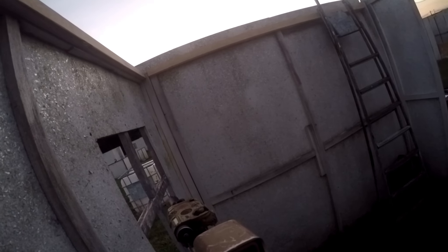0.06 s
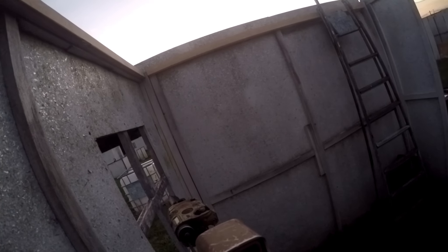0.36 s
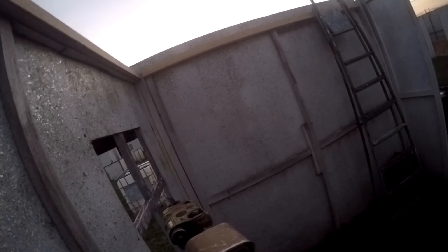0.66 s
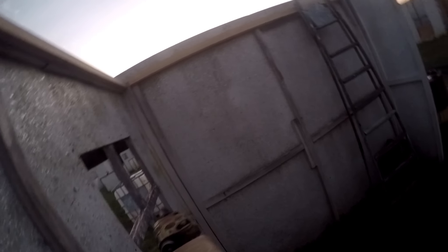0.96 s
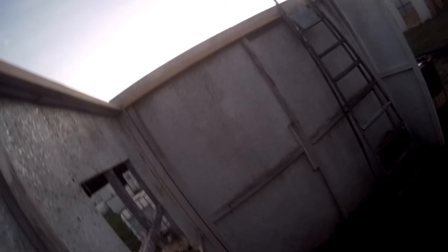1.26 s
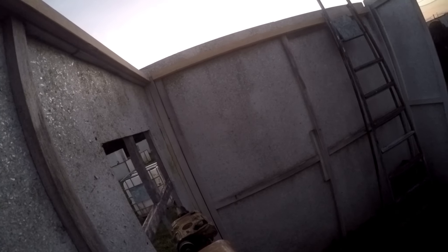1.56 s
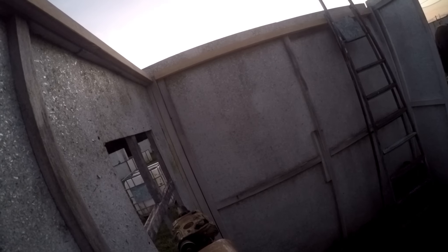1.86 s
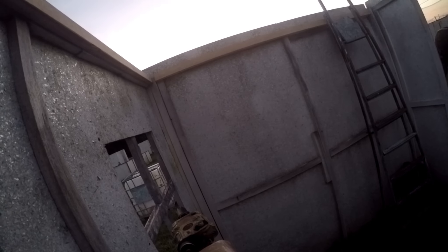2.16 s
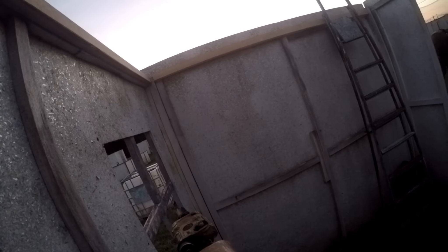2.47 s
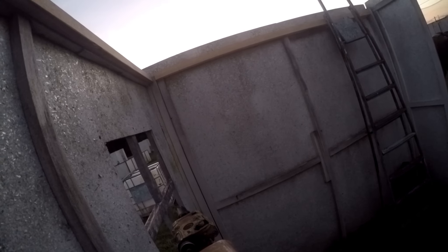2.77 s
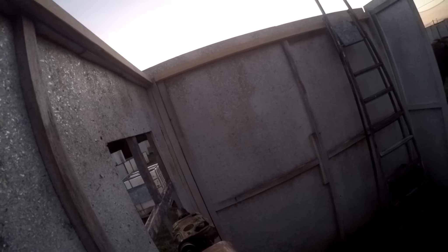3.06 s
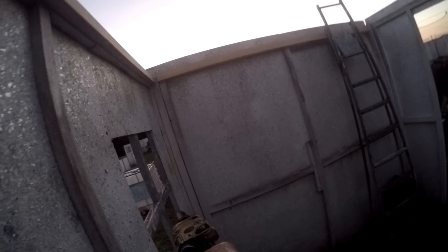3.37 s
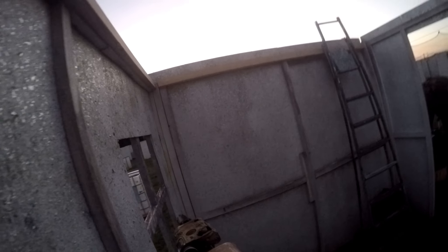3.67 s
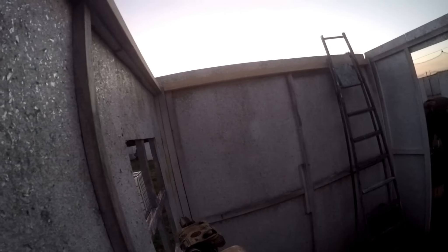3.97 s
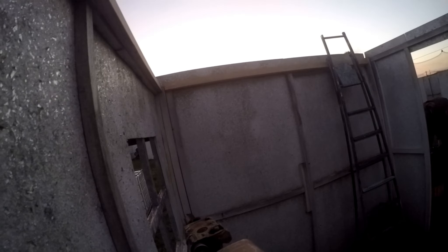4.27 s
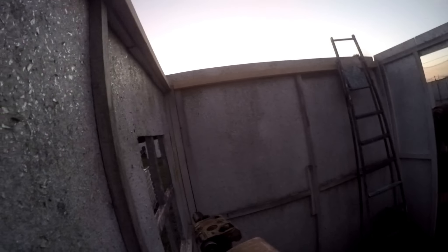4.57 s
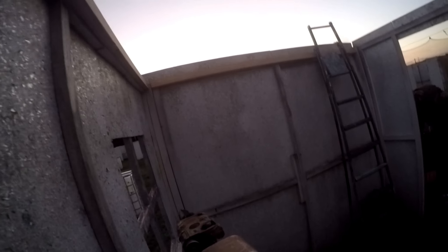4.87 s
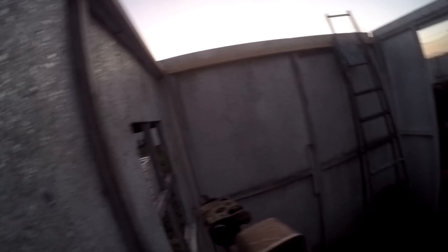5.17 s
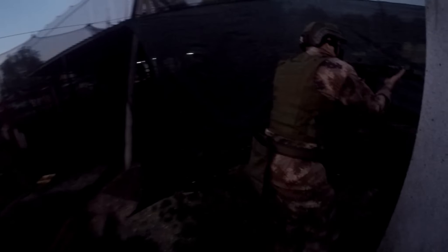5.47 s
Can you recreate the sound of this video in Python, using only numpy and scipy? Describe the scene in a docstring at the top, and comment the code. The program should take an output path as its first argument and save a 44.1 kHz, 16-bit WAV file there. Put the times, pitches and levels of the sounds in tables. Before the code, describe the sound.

An airsoft rifle fires twice close by, another pops five times farther off, then seven pellets crack sharply against hard wall panels.

```python
"""A roofless shelter of hard panels, during an airsoft game at dusk.
An electric rifle close by winds up and fires twice: meshing gears whine, then a spring-driven piston
strikes home. Another fires five times farther off. Seven pellets crack on the walls and set them ringing.
The panels reflect each sound and the field adds a faint tail. Loose gear ticks and bumps softly and
clothing rustles once, over a low rumble of air and a faint hiss."""
import sys
import numpy as np
from scipy import signal
from scipy.fft import rfft, irfft
from scipy.io import wavfile
from scipy.ndimage import uniform_filter1d

SR = 44100
rng = np.random.default_rng(int(sys.argv[2]) if len(sys.argv) > 2 else 0)


def transcribe(signal):
    """Save signal, clipped to [-1, 1], as a 16-bit WAV file at the path in sys.argv[1]."""
    frames = np.atleast_2d(signal).T
    limited = np.clip(frames, -1, 1)
    pcm = np.round(limited * 32767).astype(np.int16)
    wavfile.write(sys.argv[1], SR, pcm)


N = 252693
TIME = np.arange(N) / SR
AGE = TIME[:SR // 2]   # time within one short event
MOTOR_LEAD_S, SEAR_LEAD_S = 0.136, 0.0105   # motor start and spring release, ahead of the piston strike

# piston strikes of the near rifle: t/s, level/dB
NEAR_SHOTS = [(0.0457, -16), (0.3022, -15)]
# spectrum of the reflections from the walls: f/Hz, level/dB
WALL_ECHO = [(200, -6.5), (1000, -3), (2000, 0.5), (4200, -3.5), (7500, -4.5), (10000, -5.5), (15000, -6)]


def from_db(db):
    """Amplitude ratio for a level in decibels."""
    return 10 ** (np.asarray(db) / 20)


def rms_one(x):
    """Normalisation to unit rms."""
    return x / np.sqrt(np.mean(x ** 2) + 1e-20)


def unit(x):
    """Normalisation to unit energy."""
    return x / np.sqrt(np.sum(x ** 2) + 1e-20)


def blow(x, db):
    """Equal energy: a transient is given the energy of 10 ms of steady sound at this level."""
    return from_db(db) * unit(x) * np.sqrt(SR / 100)


def add(out, s, x):
    """Superposition: x is added at time s, as far as it fits."""
    at = int(round(s * SR))
    x, at = x[max(-at, 0):], max(at, 0)
    out[at:at + len(x)] += x[:max(len(out) - at, 0)]


def band(x, low_hz, high_hz):
    """Causal band-pass filtering."""
    sections = signal.butter(2, [low_hz, min(high_hz, SR / 2 - 1000)], "band", fs=SR, output="sos")
    return signal.sosfilt(sections, x + 1e-18)


def colour(x, spectrum, size=8192):
    """Minimum-phase filtering: a causal response of unit energy follows the given spectrum."""
    hz, db = np.transpose(spectrum)
    log_hz = np.log(np.maximum(np.arange(size // 2 + 1) * SR / size, 1))
    bass_cut_db = 20 * np.clip(np.log(hz[0]) - log_hz, 0, 2)
    cepstrum = irfft(np.log(from_db(np.interp(log_hz, np.log(hz), db) - bass_cut_db)))
    response = irfft(np.exp(rfft(2 * cepstrum[:size // 2], size)))
    return signal.fftconvolve(x, unit(response[:size // 2]))[:len(x)]


def drift(rate):
    """Random modulation: half a second at unit rms, with `rate` new values a second."""
    knots = rng.standard_normal(len(AGE) // 10)
    return rms_one(np.interp(AGE * rate, np.arange(len(knots)), knots))


def swell(s, width_s):
    """Gaussian envelope centred on time s."""
    return np.exp(-((TIME - s) / width_s) ** 2)


def mode(hz, t60):
    """Free vibration of one damped mode: an exponentially decaying sine."""
    return unit(np.sin(2 * np.pi * hz * AGE) * from_db(-60 * AGE / t60))


def ringing(t60):
    """Modal overlap: many close modes struck together sum to decaying noise."""
    return unit(rng.standard_normal(len(AGE)) * from_db(-60 * AGE / t60))


def gear_motion(t, spin_up_s=0.038, spring_lead_s=0.095, sag=0.36, recover_s=0.022, coast_s=0.115):
    """A motor slows under spring load. Gives relative speed and spring release (0-1); t=0 is the strike."""
    spin = 1 - np.exp(-np.maximum(t + MOTOR_LEAD_S, 0) / spin_up_s)
    compression = np.clip((t + spring_lead_s) / (spring_lead_s - SEAR_LEAD_S), 0, 1)
    released = 1 - np.exp(-np.maximum(t + SEAR_LEAD_S, 0) / recover_s)
    coast = 1 - (np.maximum(t, 0) / coast_s) ** 2
    speed = spin * (1 - sag * compression ** 2 * (1 - released)) * coast
    return np.maximum(speed, 1e-3), released


def gearbox(free_tooth_hz=1368, tooth_depth=0.64, rough_db=2.5, brake_after_s=0.072, brake_db_per_s=899.5):
    """Forced vibration: meshing teeth drive the shell, and their harmonics sweep over its resonances."""
    # how strongly the shell radiates a gear tone: f/Hz, level/dB
    shell_response = [(500, -15), (1100, -17.5), (1650, -9), (2150, -7), (2800, 0), (3080, -8.5),
                      (3280, 0.5), (3600, 0.5), (3950, -7.5), (4330, 5.5), (4850, -6), (5300, -13.5),
                      (7000, -9.5), (8200, -34.5)]
    # spectrum of teeth scraping: f/Hz, level/dB
    scrape_spectrum = [(250, -34.5), (600, -26.5), (1100, -23.5), (1400, -7.5), (1620, -23), (1900, -2.5),
                       (2400, -5.5), (2850, -8), (3600, -3), (4300, 2), (5300, -15), (6900, -9.5),
                       (8200, -23.5), (15500, -33)]
    t = AGE - MOTOR_LEAD_S
    speed, released = gear_motion(t)
    tooth_hz = free_tooth_hz * speed
    phase = 2 * np.pi * np.cumsum(tooth_hz * (1 + 0.008 * drift(400))) / SR
    whine = 0
    for k in range(1, 6):
        radiated_db = np.interp(k * tooth_hz, *np.transpose(shell_response))
        flutter_db = 2.2 * drift(160)
        whine = whine + from_db(radiated_db + flutter_db) * np.sin(k * phase)
    # every tooth scrapes, some harder than others
    scrape = rng.standard_normal(len(AGE)) * (1 + tooth_depth * np.cos(phase))
    rattle = rms_one(colour(scrape * from_db(rough_db * drift(600)), scrape_spectrum))
    # both grow with speed; the whine falls once unloaded, the rattle peaks around the strike
    whine_db = -13.5 + 23.5 * np.log2(speed) - 16 * released
    rattle_db = -18.5 + 11.5 * np.log2(speed) + 7.5 * np.exp(-(t / 0.012) ** 2)
    braking = from_db(-brake_db_per_s * np.maximum(t - brake_after_s, 0))
    return braking * (from_db(whine_db) * whine + from_db(rattle_db) * rattle)


def near_rifle(recoil_hz=135, recoil_db=-37):
    """Impact and reaction: gears wind a spring, which launches the piston; recoil rings the stock."""
    # sear, piston and rebound: t/s from the strike, level/dB, treble/dB, thump of the stock/dB, T60/s
    contacts = [(-0.0105, -14, 5.5, -16, 0.03), (0.0, 4, -5, -23, 0.013), (0.0052, -4.5, 4.5, -16, 0.02)]
    # spectrum of these impacts: f/Hz, level/dB
    piston_spectrum = [(180, -70.5), (300, -26), (685, -35.5), (1540, -38), (1840, -8.5), (3230, -27.5),
                       (3750, 2.5), (4210, 2), (5570, -18), (8420, -10), (9760, -35), (12700, -26),
                       (15500, -56)]
    out = np.zeros(N)
    for s, db in NEAR_SHOTS:
        add(out, s - MOTOR_LEAD_S, gearbox())
        add(out, s - SEAR_LEAD_S, blow(mode(recoil_hz, t60=0.094), recoil_db))
        for delay, contact_db, treble_db, thump_db, t60 in contacts:
            clack = colour(ringing(t60), piston_spectrum)
            clack = band(clack, 560, 6500) + from_db(treble_db) * band(clack, 6200, 15000)
            thump = band(ringing(0.025), 150, 260) + band(ringing(0.025), 500, 800)
            add(out, s + delay, blow(clack, db + contact_db) + blow(thump, db + contact_db + thump_db))
    return out


def air(jolt_db=-37.5, hiss_db=-59, sizzle_db=-77):
    """Random pressure fluctuation: air and movement rumble, under an even hiss and a faint high sizzle."""
    # spectrum of the rumble: f/Hz, level/dB
    rumble_spectrum = [(11, -37), (18, 0.5), (65, 7), (80, 0.5), (97, -4.5), (129, -17.5), (168, -16),
                       (226, -19.5), (285, -36.5), (400, -27), (520, -59.5), (880, -120)]
    # strength of air and movement at the microphone: t/s, level/dB
    rumble_levels = [(0.45, -49), (1.32, -46), (2.55, -51), (2.58, -54), (2.61, -42), (3.05, -51.5),
                     (3.43, -42.5), (4.58, -49), (4.61, -40.5), (5.24, -43.5), (5.54, -49), (5.73, -38)]
    # spectrum of the hiss: f/Hz, level/dB
    hiss_spectrum = [(150, -30.5), (250, -5), (359, -9.5), (583, -9.5), (809, -12), (961, -13),
                     (1070, -12.5), (1410, -11.5), (1730, -12.5), (2440, -11), (8320, -20), (10100, -21.5),
                     (15500, -26)]
    rumble = rms_one(colour(rng.standard_normal(N), rumble_spectrum))
    rumble = rumble / np.sqrt(uniform_filter1d(rumble ** 2, size=SR // 6))   # evens out chance swells
    envelope = from_db(np.interp(TIME, *np.transpose(rumble_levels)))
    # each near shot jolts the microphone
    jolts = from_db(jolt_db) * sum(swell(s + 0.008, width_s=0.04165) for s, _ in NEAR_SHOTS)
    hiss = from_db(hiss_db) * colour(rng.standard_normal(N), hiss_spectrum)
    sizzle = from_db(sizzle_db) * rms_one(band(rng.standard_normal(N), 10100, 10450))
    return (envelope + jolts) * rumble + hiss + sizzle


def loose_gear(random_ticks=9, random_tick_hz=2560, random_tick_db=-56):
    """Damped impacts: light contacts ring in a high band, soft bumps of the body in a low one."""
    # clicks of gear and distant taps: t/s, level/dB, centre f/Hz, bandwidth/octaves, T60/s
    ticks = [(0.4154, -40, 6300, 0.25, 0.015), (0.4181, -30.5, 2750, 1.28, 0.043),
             (3.645, -51, 1876, 0.18, 0.081), (3.735, -54, 3310, 0.89, 0.029),
             (3.796, -50.5, 1340, 0.81, 0.034), (4.165, -44.5, 3800, 1.1, 0.023),
             (5.392, -51, 1287, 0.75, 0.077), (5.702, -46, 3970, 0.37, 0.021)]
    # bumps of the body against gear: t/s, level/dB, f/Hz, T60/s
    bumps = [(1.257, -46.5, 193, 0.058), (1.451, -54, 201, 0.074), (2.603, -45, 211, 0.07),
             (2.71, -50.5, 202, 0.1), (4.64, -46.5, 199, 0.51), (5.156, -43.5, 220, 0.061),
             (5.203, -32.5, 90, 0.36), (5.374, -46, 180, 0.25)]
    out = np.zeros(N)
    for s, db, hz, octaves, t60 in ticks:
        edge_ratio = 2 ** (octaves / 2)
        add(out, s, blow(band(ringing(t60), hz / edge_ratio, hz * edge_ratio), db))
    for when, pitch in rng.random((random_ticks, 2)):
        hz = random_tick_hz * 2 ** (pitch - 0.5)
        tick = band(ringing(t60=0.06), hz / np.sqrt(2), hz * np.sqrt(2))
        add(out, when * N / SR, blow(tick, random_tick_db))
    for s, db, hz, t60 in bumps:
        add(out, s, blow(band(ringing(t60), hz / 1.43, hz * 1.23), db))
    return out


def far_rifle(gears_db=-45, gears_lead_s=0.05, gears_peak_s=0.011, gears_end_s=0.0835):
    """Multipath propagation: each narrow-band pop arrives several times, inside a short whirr of gears."""
    # shots: t/s, level/dB
    shots = [(2.0434, -33.5), (2.2583, -33.5), (2.412, -33.5), (2.564, -34), (2.718, -34)]
    # paths into the shelter: delay t/s, level/dB
    paths = [(0.0, 0), (0.0022, -12), (0.011, -7.5), (0.0122, 0), (0.0195, -13), (0.07, -14.5)]
    # spectrum of the pop: f/Hz, level/dB
    pop_spectrum = [(500, -41.5), (1200, -25), (1600, -30), (2050, -15.5), (2600, -20), (3100, -18),
                    (3750, 5), (4000, 1), (4300, 0.5), (4800, -11.5), (5300, -31), (7000, -35),
                    (14000, -49)]
    # spectrum of the gears: f/Hz, level/dB
    whirr_spectrum = [(700, -20), (1400, -18), (2050, -5.5), (3000, -5.5), (4000, 1.5), (4800, -0.5),
                      (5400, -14.5), (14000, -31.5)]
    out, envelope = np.zeros(N), np.zeros(N)
    for s, db in shots:
        for delay, path_db in paths:
            add(out, s + delay, blow(colour(ringing(t60=0.008), pop_spectrum), db + path_db))
        envelope += np.interp(TIME - s, [-gears_lead_s, gears_peak_s, gears_end_s], [0, 1, 0])
    return out + from_db(gears_db) * envelope * colour(rng.standard_normal(N), whirr_spectrum)


def pellets(click_db=-0.5, note_db=-12, ping_width_hz=700):
    """Impulse excitation: a struck panel rings, coloured by the spot hit; the other walls scatter it."""
    # hits: t/s, level/dB, echo/dB, panel note f/Hz, then the colour of the spot:
    # thud/dB, knock/dB, snap/dB, fizz/dB, ping f/Hz, ping/dB
    hits = [(3.0376, -12, 6.5, 3140, -8, -4, -5.5, -11, 7930, 6),
            (3.2165, -6, 0, 3820, -4.5, 1.5, 5, 7.5, 7280, -1),
            (3.3693, -6, 0.5, 3677, -0.5, 1, -6.5, -6.5, 6400, -4.5),
            (3.4989, -9, 1, 3704, -2.5, -3, -10.5, -11, 7330, 0.5),
            (3.94, -6, -0.5, 4035, -3.5, 2, -3, 1, 8800, -9),
            (4.0628, -3.5, -4.5, 3953, 6, 4, -2.5, 5, 6900, -11),
            (4.2254, -5, -2, 3680, 2, 1.5, 1.5, -11.5, 7260, -4)]
    # frequency response of a panel: f/Hz, level/dB
    panel_response = [(120, -34), (500, -27), (1000, -24.5), (1500, -16.5), (1950, -9), (2600, -13),
                      (3200, -7.5), (3800, -2), (4350, -1.5), (5300, -9.5), (7300, -7), (9500, -13.5),
                      (12000, -19), (15500, -26.5)]
    out = np.zeros(N)
    for s, db, echo_db, note_hz, thud, knock, snap, fizz, ping_hz, ping_db in hits:
        contact = unit(ringing(t60=0.0052) + from_db(click_db) * (AGE == 0))
        ping = from_db(ping_db) * band(contact, ping_hz - ping_width_hz / 2, ping_hz + ping_width_hz / 2)
        note = from_db(note_db) * mode(note_hz, t60=0.016)
        tail = np.zeros(len(AGE))
        add(tail, 0.0008, from_db(-4) * ringing(t60=0.015))   # struck panel
        add(tail, 0.004, from_db(-11 + echo_db) * ringing(t60=0.033))   # nearest wall
        add(tail, 0.012, from_db(-13 + echo_db) * ringing(t60=0.14))   # other walls
        add(tail, 0.03, from_db(-39.5) * ringing(t60=1.0))   # field
        strike = contact + ping + note + colour(tail, WALL_ECHO)
        spot = [(20, thud), (700, thud), (1900, knock), (4000, 0), (7500, snap), (12000, fizz)]
        add(out, s, blow(colour(colour(strike, panel_response), spot), db))
    return out


def clothing(at_s=4.62, width_s=0.1, level_db=-61.5, grain_db=2.0, grains_per_s=60):
    """Friction noise: cloth gives one grainy rustle as the player shifts."""
    grains = rng.standard_normal(N) * from_db(grain_db * np.resize(drift(grains_per_s), N))
    return from_db(level_db) * swell(at_s, width_s) * rms_one(band(grains, 1704, 3980))


def shelter(x, near_wall_db, walls_db, field_db, field_t60):
    """Reflection: the nearest wall answers first, the others later, and the field adds a longer tail."""
    # spectrum of the sound returned by the field: f/Hz, level/dB
    field_echo = [(300, -5), (2000, -1.5), (4200, -0.5), (6000, -9), (14000, -18)]
    echoes = np.zeros(len(AGE))
    add(echoes, 0.004, from_db(near_wall_db) * unit(colour(ringing(t60=0.066), WALL_ECHO)))
    add(echoes, 0.013, from_db(walls_db) * unit(colour(ringing(t60=0.12), WALL_ECHO)))
    add(echoes, 0.03, from_db(field_db) * unit(colour(ringing(field_t60), field_echo)))
    return x + signal.fftconvolve(x, echoes)[:N]


def scene():
    """Superposition of all sources; the farther rifle has the larger share of reflected sound."""
    close_sounds = near_rifle() + loose_gear() + clothing()
    near = shelter(close_sounds, near_wall_db=-19, walls_db=-16, field_db=-26, field_t60=0.36)
    far = shelter(far_rifle(), near_wall_db=-10.5, walls_db=-9.5, field_db=-15, field_t60=0.69)
    return (near + far + pellets() + air())[None]


def record(dry, threshold_db=-19.0, squeeze=0.3, attack_s=0.02, release_db_per_s=4.0, cutoff_hz=15300):
    """Saturation and compression: peaks overload and lower the gain; two brief gaps; the top is cut."""
    # brief silences: start t/s, end t/s
    gaps = [(1.4656, 1.4778), (5.5012, 5.5164)]
    sound = dry[0] / (1 + dry[0] ** 6) ** (1 / 6)
    level_db = 10 * np.log10(np.maximum(uniform_filter1d(sound ** 2, size=441), 1e-12))
    cut_db = squeeze * np.maximum(level_db - threshold_db, 0)
    cut_db = np.maximum.accumulate(cut_db + release_db_per_s * TIME) - release_db_per_s * TIME
    pole = np.exp(-1 / (attack_s * SR))
    sound = sound * from_db(-signal.lfilter([1 - pole], [1, -pole], cut_db))
    for start, end in gaps:
        sound = sound * ((TIME < start) | (TIME > end))
    return signal.fftconvolve(sound, signal.firwin(255, cutoff_hz, fs=SR), "same")[None]


dry = scene()
out = record(dry)
transcribe(out)
```